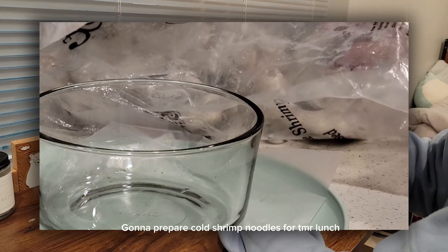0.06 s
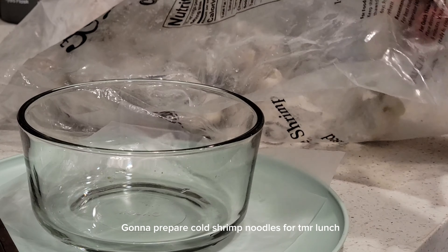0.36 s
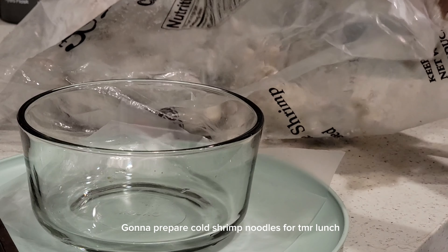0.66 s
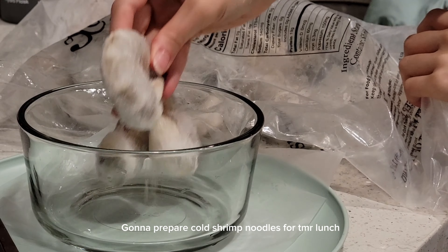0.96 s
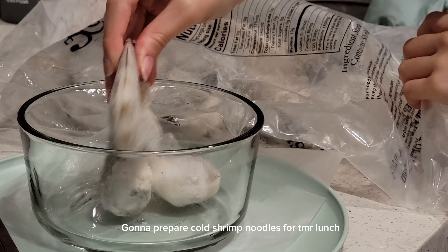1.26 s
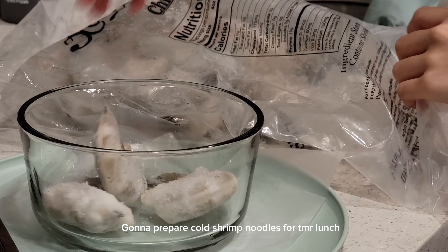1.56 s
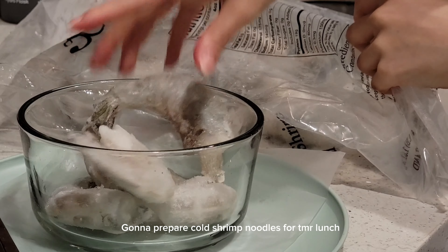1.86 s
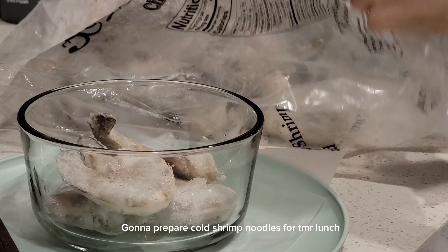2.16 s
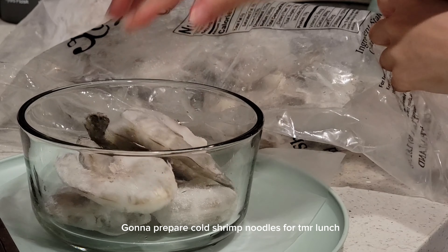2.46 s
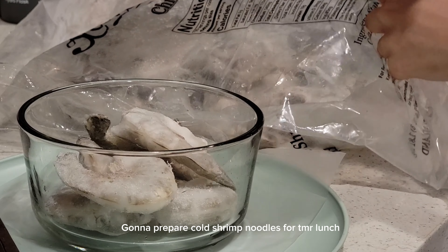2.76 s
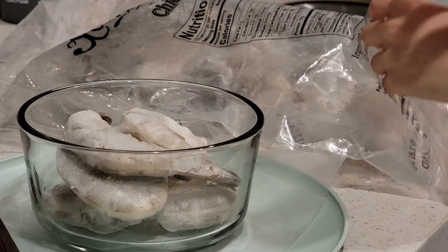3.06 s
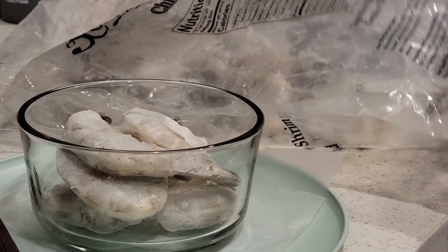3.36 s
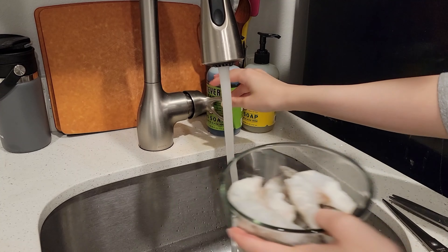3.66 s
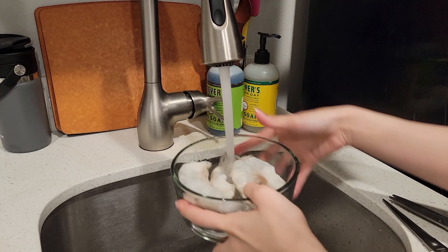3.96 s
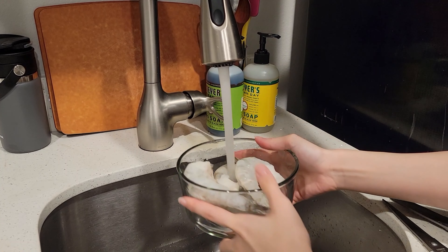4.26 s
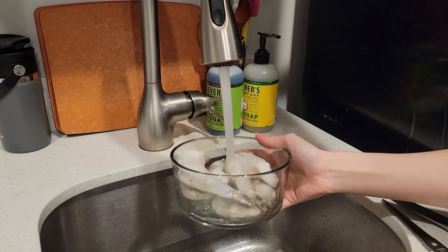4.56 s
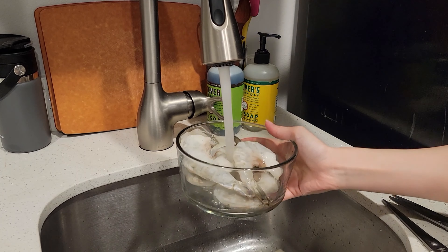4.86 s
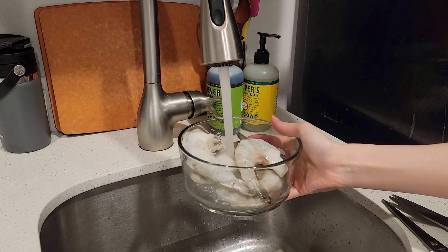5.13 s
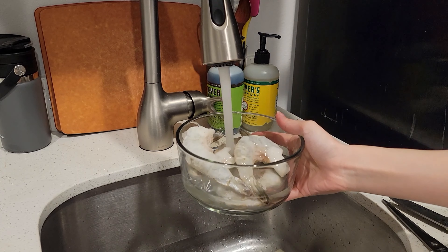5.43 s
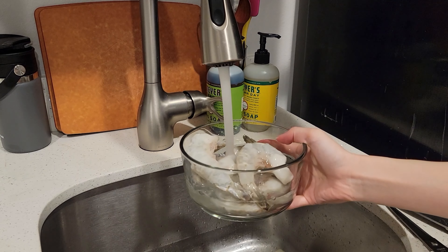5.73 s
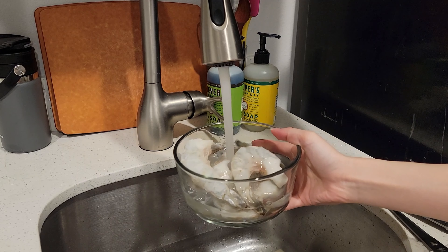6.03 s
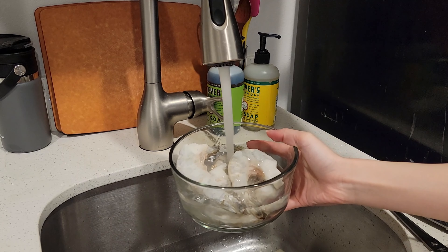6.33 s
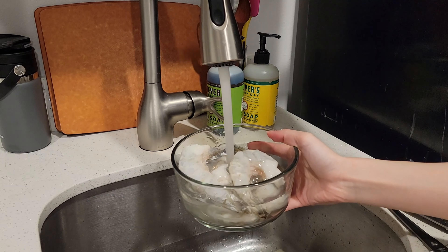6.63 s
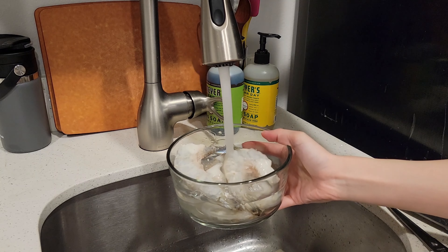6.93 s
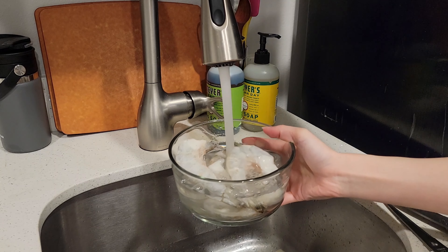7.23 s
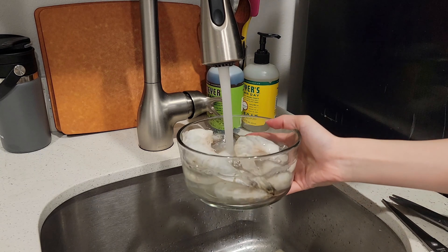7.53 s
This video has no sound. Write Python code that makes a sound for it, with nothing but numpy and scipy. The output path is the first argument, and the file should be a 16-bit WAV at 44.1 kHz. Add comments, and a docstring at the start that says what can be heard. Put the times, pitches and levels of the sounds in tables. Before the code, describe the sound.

Close up in a quiet kitchen, plastic rustles as frozen shrimp are pulled from a bag. They clatter and skid into a glass bowl in three batches, making the glass ring briefly. The bag crinkles again, and just before halfway the sound switches to a running tap. Water splashes on the shrimp and the rim, then settles into an even hiss with light gurgling over a steel sink.

```python
"""A kitchen, at the counter and then the sink. Frozen shrimp are pulled from a plastic bag, whose film
buckles and crinkles, and dropped into a glass bowl. Each icy body knocks, skids and squeaks, exciting
the normal modes of the glass. Then an aerated tap hisses into the steel sink, spatters on the shrimp
and fills the bowl, where entrained air rings as bubbles."""
import sys
import numpy as np
from scipy import signal
from scipy.fft import rfft, irfft
from scipy.io import wavfile
from scipy.ndimage import map_coordinates

SR = 44100
rng = np.random.default_rng(int(sys.argv[2]) if len(sys.argv) > 2 else 0)


def store_pcm(level_fs):
    """Save levels as 16-bit WAV."""
    pcm = np.round(np.clip(level_fs, -1, 1) * 32767).astype(np.int16)
    wavfile.write(sys.argv[1], SR, np.atleast_2d(pcm).T)


N = 339129
TIME = np.arange(N) / SR
TAP_ON_S = 3.505
# Impacts of shrimp on glass; the landing point decides which rim mode sings out. Each row: start in
# seconds, relative knock level in dB, contact brightness in Hz, singing mode in Hz, its excitation in dB.
DROPS = [(1.024, 1.5, 650, 1190, -29), (1.033, -10.5, 2500, 4300, -34.5), (1.245, 6.5, 3850, 4300, -13.5),
         (1.268, -2, 5000, 2570, -34), (1.281, -2.5, 4500, 1190, -36), (1.303, -.5, 4000, 1190, -27),
         (1.345, -5.5, 3000, 1190, -28.5), (1.376, -8, 4000, 2570, -32), (1.390, -3, 9000, 6500, -48),
         (1.433, -26, 3000, 1190, -32), (1.465, -26, 3000, 2570, -50), (1.520, -14, 9000, 4300, -52),
         (1.567, -16.5, 6000, 1190, -47), (1.732, -23, 5000, 2570, -38), (1.893, -10.5, 2500, 2570, -36.5),
         (1.921, -17, 4000, 1190, -28), (1.962, 11, 2880, 1190, -19), (1.969, -3, 3500, 2570, -24),
         (2.013, -19, 2500, 2570, -19), (2.031, -12, 2500, 2570, -18), (2.10, -26, 2500, 2570, -30),
         (2.448, -19, 5000, 3250, -24), (2.895, -21, 1500, 2570, -25), (2.905, 5, 3030, 1190, -19),
         (2.909, -2.5, 4000, 4300, -18), (2.913, -9, 9000, 12800, -33), (2.916, 2.5, 4000, 2570, -15.5),
         (2.922, -3, 2000, 1230, -19), (2.926, -5, 4000, 6500, -30), (2.957, -1, 4000, 2570, -20),
         (2.968, -15, 3500, 4300, -21.5), (3.002, -11.5, 2500, 2570, -28.5), (3.123, -29, 3050, 2570, -41)]


def amp(db):
    """Amplitude ratio of a level in decibels."""
    return 10 ** (np.asarray(db) / 20)


def unit(x):
    """The signal scaled to rms 1."""
    return x / np.sqrt(np.mean(x ** 2))


def lookup(points, hz):
    """Interpolation of (Hz, value) points on a log-frequency axis."""
    f, value = np.transpose(points)
    return np.interp(np.log(np.maximum(hz, 1)), np.log(f), value)


def response(points, size=2048):
    """Minimum-phase impulse response of a (Hz, dB) spectrum, energy 1."""
    cepstrum = irfft(np.log(amp(lookup(points, np.fft.rfftfreq(size, 1 / SR)))))
    cepstrum[1:size // 2] *= 2
    cepstrum[size // 2 + 1:] = 0
    h = irfft(np.exp(rfft(cepstrum)))
    return h / np.linalg.norm(h)


def convolve(x, h):
    """Linear filtering by the impulse response h."""
    return signal.oaconvolve(np.atleast_2d(x), np.atleast_2d(h), axes=1)[:, :N]


def add(track, s, sound):
    """Superposition of a sound on a track, from s seconds on."""
    start = int(s * SR)
    track[..., start:start + sound.shape[-1]] += sound[..., :N - start]


def fading(t60):
    """Time axis and envelope of an exponential decay by 60 dB."""
    t = TIME[:int(t60 * SR) + 2]
    return t, amp(-60 * t / t60)


def ring(hz, t60, glide=0):
    """A damped oscillator; a bubble's pitch glides up as it nears the surface."""
    t, envelope = fading(t60)
    return envelope * np.sin(2 * np.pi * hz * t * (1 + glide * t / t60))


def resonator(modes):
    """Impulse response as a sum of (Hz, energy in dB, t60) modes."""
    h = np.zeros(SR // 2)
    for hz, db, t60 in modes:
        mode = ring(hz, t60)
        add(h, 0, amp(db) * mode / np.linalg.norm(mode))
    return h


def burst(t60, channels=2):
    """Dense short-lived modes overlap into decaying noise, energy near 1 a channel."""
    t, envelope = fading(t60)
    return rng.standard_normal((channels, len(t))) * envelope / np.linalg.norm(envelope)


def wander(rate):
    """Random fluctuation through `rate` values a second, spread near 1."""
    knots = rng.standard_normal(4096)
    return np.interp(TIME * rate, np.arange(len(knots)), knots)


def clicks(rate, spread_db):
    """A Poisson train of impulses, mostly small and a few large; rms 1."""
    size = amp(spread_db * np.minimum(rng.exponential(size=N), 4))
    return unit((rng.random(N) < rate / SR) * size * rng.choice([-1, 1], N))


def swells(rows, rise_db_per_s, fall_db_per_s):
    """Gain of (start s, length s, dB) movements that rise, hold and decay; their powers add."""
    power = np.zeros(N)
    for s, length, db in rows:
        below = rise_db_per_s * np.maximum(s - TIME, 0) + fall_db_per_s * np.maximum(TIME - s - length, 0)
        audible = below < 80
        power[audible] += amp(db - below[audible]) ** 2
    return np.sqrt(power)


def spread(left_right, merge_hz):
    """Spatial coherence: long waves reach left and right alike."""
    mid, side = left_right.mean(0), (left_right[0] - left_right[1]) / 2
    side = signal.sosfilt(signal.butter(1, merge_hz, "high", fs=SR, output="sos"), side)
    return np.array([mid + side, mid - side])


def room(x, near_db, far_db, size=22050):
    """Reverberation: direct sound, early reflections off counter and wall, then a diffuse tail."""
    # Each row: frequency in Hz, reverberation time in seconds.
    room_t60 = [(100, 0.37), (500, 0.28), (2000, 0.3), (6000, 0.48), (16000, 0.27)]
    f, t = np.fft.rfftfreq(size, 1 / SR), TIME[:size]
    noise, h = rfft(rng.standard_normal((2, size))), np.zeros((2, size))
    centres = np.geomspace(100, 16000, 8)
    for hz, share in zip(centres, np.eye(len(centres))):
        envelope = amp(-60 * t / lookup(room_t60, hz))
        band = irfft(noise * lookup(np.c_[centres, share], f), size)
        h += amp(far_db) * band * envelope / np.linalg.norm(envelope)
    add(h, .001, amp(near_db) * burst(t60=.05))
    h = spread(h, merge_hz=600)
    h[:, 0] += 1  # direct path
    return convolve(x, h / np.sqrt(np.sum(h ** 2) / 2))


def kitchen(counter_db=-58, sink_db=-65.5, hiss_db=-80):
    """Ambient noise: a low room rumble, stronger at the counter than at the sink, and a faint hiss."""
    # Each row: frequency in Hz, relative rumble level in dB.
    spectrum = [(15, -22), (35, -9.5), (70, -4.5), (100, -10.5), (160, -26), (430, -21.5), (800, -26.5),
                (1600, -28.5), (7000, -34), (8500, -44), (15000, -58)]
    gain = amp(np.where(TIME < TAP_ON_S, counter_db, sink_db))
    rumble = convolve(rng.standard_normal((2, N)), response(spectrum, size=8192))
    return gain * unit(spread(rumble, merge_hz=400)) + amp(hiss_db) * rng.standard_normal((2, N))


def bag():
    """Buckling and impact: the bending film crinkles, sharp clicks ring, the load thuds on the counter."""
    # Each row: start and length of a tug in seconds, relative crinkle and thud levels in dB.
    tugs = [(.005, 0.073, -36, -46.5), (0.228, 0.075, -46, -55), (.1, 0.42, -46.5, -62),
            (0.399, 0.026, -48, -48.5), (0.485, 0.074, -38, -48.5), (0.59, 0.14, -37, -43),
            (0.765, .13, -47.5, -53), (2.232, 0.067, -51.5, -52), (2.446, .016, -39.5, -70),
            (3.308, .08, -46, -51.5), (3.396, 0.086, -42, -47)]
    # Sharp ringing clicks of the bag's creases and of one frozen shrimp landing on another.
    # Each row: start in seconds, relative level in dB, ring pitch in Hz, ring offset in dB.
    snaps = [(.044, -4, 2700, -15), (.108, -12, 1520, -15), (.408, -21, 1000, 8), (.495, -5.5, 2970, -2),
             (.501, 0.5, 1450, -8), (.602, -3, 2770, -11), (.674, -14, 700, 1), (.713, -1.5, 1430, -11),
             (.811, -13.5, 2030, 2), (.876, -12, 3000, -9), (2.243, -27, 2640, 14.5),
             (2.303, -18.5, 2880, 8), (2.448, -3.5, 3390, 8), (2.454, -7.5, 3140, 4),
             (3.408, -19.5, 553, 11), (3.437, -20, 5070, 7)]
    # Spectra of the film and the heap of shrimp. Each row: frequency in Hz, relative level in dB.
    film_spectrum = [(120, -32), (200, -15), (270, -12.5), (520, -6.5), (930, -11), (1200, -6),
                     (1700, -6.5), (2900, -8), (4400, -13), (7000, -14), (9000, -21), (12000, -22),
                     (16000, -21.5)]
    heap_spectrum = [(25, -16), (50, -13), (80, 4.5), (130, -1.5), (190, -2), (260, -6.5), (550, -3.5),
                     (1000, -9), (3000, -37.5)]
    # Each row: frequency in Hz, relative energy in dB, t60 in seconds.
    counter_modes = [(80, -5, .15), (192, -3.5, 0.21), (547, -10, 0.095)]
    bending = swells([(s, span, db) for s, span, db, _ in tugs], rise_db_per_s=900, fall_db_per_s=258)
    shoving = swells([(s, span, db) for s, span, _, db in tugs], rise_db_per_s=500, fall_db_per_s=304)
    crinkle = clicks(rate=1500, spread_db=4.5) * amp(2 * wander(45)) * bending
    ticks, ringing = np.zeros(N), np.zeros(N)
    for s, db, hz, ring_db in snaps:
        add(ticks, s, amp(db) * burst(t60=0.0029, channels=1)[0])
        tone = ring(hz, t60=9 / hz + 0.0038)
        add(ringing, s, amp(db + ring_db) * tone / np.linalg.norm(tone))
    crackle = convolve(amp(0.5) * crinkle + amp(-0.5) * ticks, response(film_spectrum)) + ringing
    thuds = clicks(rate=260, spread_db=2) * shoving
    heap = amp(0.5) * convolve(thuds, response(heap_spectrum))
    counter = amp(-2.5) * convolve(thuds, resonator(counter_modes))
    return room(crackle, near_db=5.5, far_db=0) + room(heap + counter, near_db=-5.5, far_db=-10)


def basin():
    """Forced resonance: the steel basin hums under the jet."""
    # Each row: centre frequency in Hz, bandwidth in Hz, level in dB.
    resonances = [(70, 60, -82), (117.5, 12, -69), (354.4, 20, -66.5), (515.4, 13.6, -66), (829, 54, -65),
                  (1844, 260, -61)]
    out = np.zeros((2, N))
    for hz, width, db in resonances:
        hum = signal.lfilter(*signal.iirpeak(hz, hz / width, fs=SR), rng.standard_normal((2, N)))
        out += amp(db) * unit(spread(hum, merge_hz=470))
    return out * (TIME > TAP_ON_S)


def covered(s, halfway_s=5.9, time_constant_s=0.32):
    """Share of the shrimp under water, a logistic rise from 0 to 1."""
    return 1 / (1 + np.exp((halfway_s - s) / time_constant_s))


def bubbles(low_hz, high_hz, cycles, spread_db, count):
    """Bubble resonance: air pinched off under the jet rings briefly; rms 1 while the tap runs."""
    out = np.zeros(N)
    for when, pitch, size in rng.random((count, 3)):
        hz = low_hz * (high_hz / low_hz) ** pitch
        gain = amp(-spread_db * np.log(max(size, .02)))
        add(out, TAP_ON_S + when * (TIME[-1] - TAP_ON_S), gain * ring(hz, cycles / hz, glide=0.066))
    return out / np.std(out[TIME > TAP_ON_S])


def pool(shallow_hz=1880, deep_hz=2970, spread_oct=0.64):
    """Air entrainment: the pool's bubbles get smaller, so higher, as the bowl fills; rms 1 meanwhile."""
    out = np.zeros(N)
    for when, pitch, size in rng.random((900, 3)):
        s = TAP_ON_S + when * (TIME[-1] - TAP_ON_S)
        centre_hz = shallow_hz + (deep_hz - shallow_hz) * covered(s)
        hz = centre_hz * 2 ** (spread_oct * (pitch - .5))
        add(out, s, amp(-14 * size) * ring(hz, t60=0.0096, glide=0.037))
    return out / np.std(out[TIME > TAP_ON_S])


def churn(steady_db=-60.5, flooded_db=-6.5):
    """Entrainment surges when the jet finds a gap in the shrimp; large bubbles fade as the gaps flood."""
    # Each row: start in seconds, length in seconds, relative level in dB.
    surges = [(4.3, 0.19, -52.5), (5.05, 0.23, -53), (6.25, 0.17, -55)]
    gain = np.hypot(amp(steady_db), swells(surges, rise_db_per_s=47, fall_db_per_s=70))
    gurgle = bubbles(750, 2200, cycles=16, spread_db=2.5, count=800)
    gurgle *= amp(-3 + flooded_db * covered(TIME))
    return gain * (gurgle + pool())


def spray():
    """Drop impact: the jet breaks on the rim and the bare shrimp."""
    # Each row: start in seconds, length in seconds, level in dB.
    splashes = [(3.64, 0.0075, -30.5), (3.71, 0.044, -37.5), (3.812, 0.01, -34.5), (3.85, 0.21, -51),
                (3.903, 0.022, -33.5), (3.94, 0.0054, -38.5)]
    # Each row: frequency in Hz, relative level in dB.
    spectrum = [(300, -8.5), (700, -16.5), (1150, -7.5), (2100, -10.5), (2700, -1), (3600, 1), (4800, -2),
                (6800, -0.5), (9500, -12.5), (15500, -7)]
    drops = clicks(rate=2200, spread_db=6.0) * swells(splashes, rise_db_per_s=2000, fall_db_per_s=170)
    return convolve(drops, response(spectrum))


def plops():
    """Large air pockets and thumps of water ring as damped oscillators of rising pitch."""
    # Each row: start in seconds, initial frequency in Hz, level in dB, t60 in seconds.
    pockets = [(3.513, 340, -36, .087), (3.640, 140, -37, 0.14), (3.643, 2730, -34, 0.14),
               (3.678, 2580, -27, 0.042), (3.685, 73, -42.5, 0.18), (3.708, 1090, -37, .063),
               (4.284, 1800, -40, .026), (5.139, 1010, -30.5, .018), (5.143, 430, -47, .063),
               (5.214, 1366, -30, 0.055), (5.310, 711, -43.5, 0.13), (4.76, 132, -49, 0.16),
               (5.53, 61, -43.5, .2), (6.389, 125.6, -50.5, 0.65)]
    out = np.zeros(N)
    for s, hz, db, t60 in pockets:
        add(out, s, amp(db) * ring(hz, t60, glide=0.077))
    return room(out, near_db=-6, far_db=-7)


def shifting_pockets(x, depth_db, width_hz, hold_s):
    """Cavity resonance: gaps between the shrimp open and close, so narrow peaks come and go."""
    f, t, cells = signal.stft(x, SR, nperseg=1024)
    places = np.meshgrid(f / width_hz, t / hold_s, indexing="ij")
    pockets = map_coordinates(rng.standard_normal((300, 200)), places, order=1, mode="mirror")
    return signal.istft(cells * amp(depth_db * pockets), SR, nperseg=1024)[1][:, :N]


def aerator(level_db=-43):
    """Flow noise: the steady aerated jet hisses over a broad band, with a slight flutter."""
    # Each row: frequency in Hz, relative level in dB.
    spectrum = [(150, -28), (300, -5.5), (430, -21.5), (520, -5.5), (620, -16.5), (850, -14.5),
                (1150, -6.5), (1550, -16.5), (1900, 0), (2300, -5.5), (2800, -4), (4500, -3), (7000, -0.5),
                (9000, -6.5), (12000, -5), (15800, -2)]
    fizz = np.array([rng.standard_normal(N) + 0.72 * clicks(rate=2000, spread_db=3.0) for _ in range(2)])
    hiss = spread(convolve(fizz, response(spectrum)), merge_hz=360)
    gain = (TIME > TAP_ON_S) * amp(level_db + wander(25))
    return shifting_pockets(hiss * gain, depth_db=2.2, width_hz=190, hold_s=.11)


def tap(froth_db=-52.5):
    """Running water as a superposition of flow noise, basin resonance, bubbles and spray."""
    flow = aerator() + basin()
    churning = churn()
    froth = amp(froth_db) * bubbles(2385, 7900, cycles=37, spread_db=2.0, count=1000)
    return flow + room(churning + froth + spray(), near_db=7, far_db=3) + plops()


def squeaks():
    """Stick-slip friction rings a narrow resonance of the frozen shell."""
    # Each row: loudest moment in seconds, frequency in Hz, level in dB, half length in seconds.
    slips = [(1.189, 5380, -50.5, 0.044), (1.219, 6360, -46, .02), (1.282, 4780, -32, .012),
             (1.377, 3600, -31.5, 0.0077), (1.392, 6520, -31, 0.0096), (1.526, 7000, -44, .012),
             (1.935, 3120, -46, .025)]
    out = np.zeros(N)
    for s, hz, db, half_s in slips:
        chatter = signal.lfilter(*signal.iirpeak(hz, Q=24, fs=SR), clicks(rate=4000, spread_db=2.0))
        out += amp(db) * unit(chatter) * np.exp(-((TIME - s) / half_s) ** 2)
    return room(out, near_db=-3, far_db=-2.5)


def rim(rise_s=0.0012, waver_hz=2.6, sing_fall_db_per_oct=63):
    """Normal modes: the glass stores each impact's energy; the shifting load makes the pitch waver."""
    # Modes of the bowl; close pairs beat. Each row: frequency in Hz, relative level in dB,
    # nominal t60 in seconds, phase between left and right in radians.
    modes = [(790, -11.5, 0.15, 0.38), (900, -6, 0.23, .6), (1187, -2, 0.54, 1.16), (1230, -9, 0.52, 3),
             (1420, -23, 0.24, 1.6), (1604, -5.5, 0.26, 0.85), (2130, -23, 0.25, 1), (2568, 1.5, 0.4, 0.79),
             (2578, -11.5, 0.8, 0.77), (3220, -18, 0.2, 1.3), (3920, -7, 0.26, 0.92),
             (4320, -3.5, 0.19, 0.53), (4240, 0, 0.15, 1.9), (4334, -8.5, 0.7, 3), (6490, 8.5, 0.31, 1.76),
             (7110, -12, .35, 1.5), (9200, -5.5, 0.25, 2.4), (11070, 6, .35, 2), (11600, -10, .3, 1.5),
             (12100, -6, .28, 1.9), (13400, -8, 0.21, 1.5), (13560, -4, 0.43, 1.7), (15350, -3, 0.2, 1.7)]
    # Every knock stirs the whole rim. Each row: frequency in Hz, level relative to the knock in dB.
    stir = [(1180, -36.5), (2570, -42.5), (4300, -44), (6500, -46.5), (9000, -40.5), (15000, -35)]
    size = int((DROPS[-1][0] + 1) * SR)
    t, out = TIME[:size], np.zeros((2, N))
    for hz, db, t60, lag in modes:
        energy, pitch_ratio = np.zeros(size), hz / stir[0][0]
        treble_damping = pitch_ratio ** 0.35  # soft flesh stops high modes sooner
        for s, knock_db, bright_hz, sing_hz, sing_db in DROPS:
            load_damping = 1 + 0.49 * (s - DROPS[0][0])  # grows as shrimp pile up
            stirred_db = knock_db + lookup(stir, hz) - 10 * np.log10(1 + (hz / bright_hz) ** 2)
            singing_db = sing_db - sing_fall_db_per_oct * abs(np.log2(hz / sing_hz))
            age, decay = fading(0.93 * t60 / load_damping / treble_damping)
            attack = 1 - np.exp(-age / rise_s)
            add(energy, s, (amp(db + max(stirred_db, singing_db)) * attack * decay) ** 2)
        drift_hz = waver_hz * np.sqrt(pitch_ratio) * wander(59.45)[:size]
        phase = 2 * np.pi * (hz * t + np.cumsum(drift_hz) / SR)
        add(out, 0, np.sqrt(energy) * np.sin([phase + lag, phase]))
    return out + amp(-4.5) * room(out, near_db=1, far_db=10.5)


def bowl():
    """Impact and sliding friction drive the damped modes of the loaded bowl and the plate under it."""
    # Each row: frequency in Hz, relative level in dB.
    knock_spectrum = [(60, -27), (180, -24), (320, -8), (520, -9), (850, -1.5), (1300, 4), (1800, -3.5),
                      (3200, -1.5), (4500, -11.5), (5700, -15), (7000, -6), (8300, -24.5), (13000, -5),
                      (16000, -35)]
    scrape_spectrum = [(200, -13.5), (400, -4), (900, -0.5), (1800, -1.5), (3500, 0), (5500, -5),
                       (7200, -8), (8400, -14.5), (10500, -14.5), (13500, -11), (16000, -12.5)]
    # Shrimp slide on glass and each other. Each row: start and length in seconds, relative level in dB.
    skids = [(1.01, 0.026, -45), (1.15, .08, -52), (1.235, 0.15, -38), (1.45, 0.15, -49.5),
             (1.79, 0.066, -49), (1.91, 0.053, -39), (2.15, 0.058, -55), (2.903, 0.026, -27.5),
             (3.05, 0.21, -60)]
    # Each row: frequency in Hz, relative energy in dB, t60 in seconds.
    clack_modes = [(318, -13, .09), (538, -6.5, 0.075), (797, 2.5, 0.085), (917, -1.5, 0.1),
                   (1196, 3.5, 0.076), (1393, -5, 0.035), (2152, -5, 0.086), (3034, -6.5, 0.092),
                   (3580, -3.5, 0.038), (4280, 1.5, 0.038), (4790, -4, 0.055), (7260, 3.5, 0.028),
                   (9200, 8.5, 0.087), (12030, 4.5, 0.098), (13550, 3, .07), (15350, -5, .1)]
    knocks, body = np.zeros(N), response(knock_spectrum)
    for s, knock_db, bright_hz, *_ in DROPS:
        # a softer contact pushes for longer and loses the treble
        knock = signal.sosfilt(signal.butter(1, bright_hz, fs=SR, output="sos"), body)
        add(knocks, s, amp(knock_db) * knock / np.linalg.norm(knock))
    scrape = convolve(clicks(rate=2200, spread_db=2.5), response(scrape_spectrum))[0]
    sliding = swells(skids, rise_db_per_s=800, fall_db_per_s=282)
    contact = amp(-1.5) * (knocks + scrape * sliding)
    clack = amp(-17) * convolve(contact, resonator(clack_modes))
    return room(contact, near_db=3.5, far_db=1.5) + room(clack, near_db=5, far_db=-1)


def scene():
    """Superposition of all sources."""
    return bowl() + rim() + squeaks() + bag() + tap() + kitchen()


def record(dry, dip_db=-17, top_hz=15900):
    """The level dips briefly five times, and a steep low-pass filter removes the highest treble."""
    # Each entry: centre of a dip in seconds.
    dip_times = [0.92, 1.716, 2.337, 2.866, 3.5]
    dips = sum(np.exp(-((TIME - s) / .009) ** 4) for s in dip_times)
    low_pass = signal.ellip(10, .2, 70, top_hz, fs=SR, output="sos")
    return signal.sosfilt(low_pass, dry * amp(dip_db * dips))


dry = scene()
out = record(dry)
store_pcm(out)
```